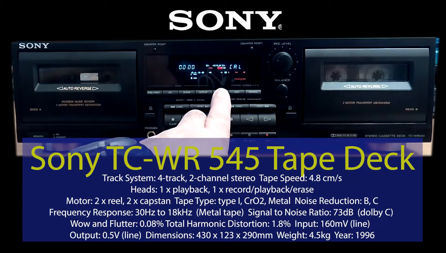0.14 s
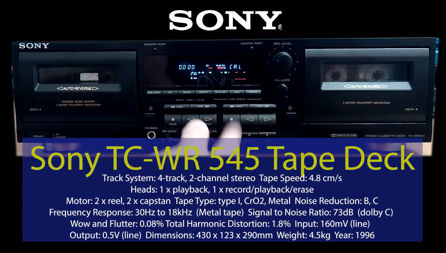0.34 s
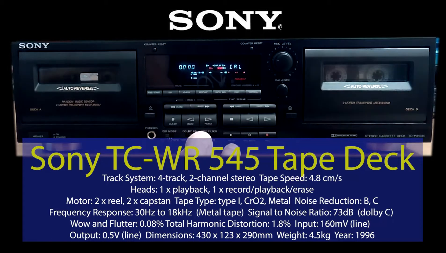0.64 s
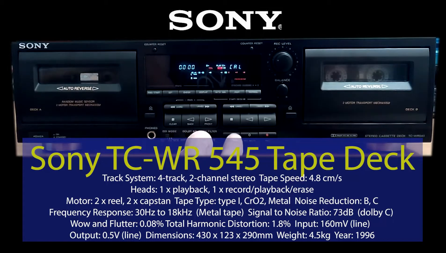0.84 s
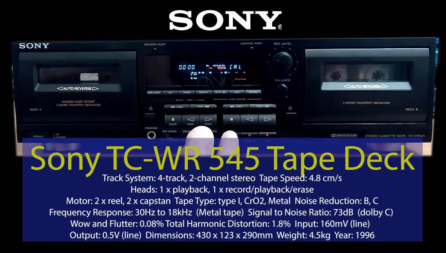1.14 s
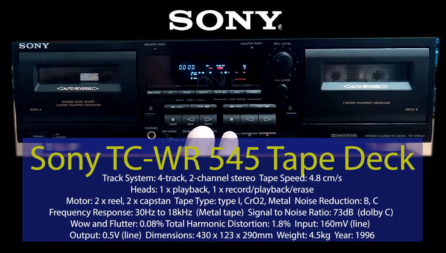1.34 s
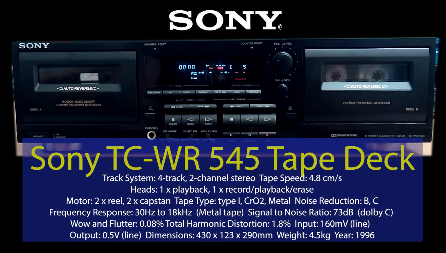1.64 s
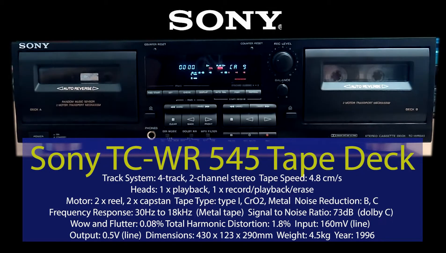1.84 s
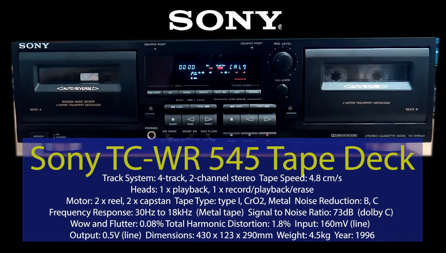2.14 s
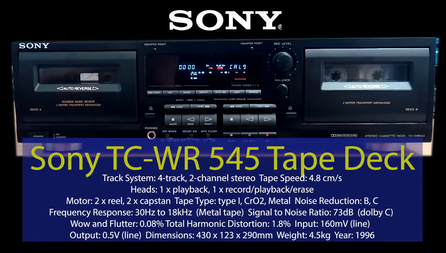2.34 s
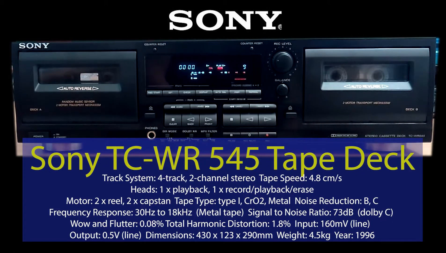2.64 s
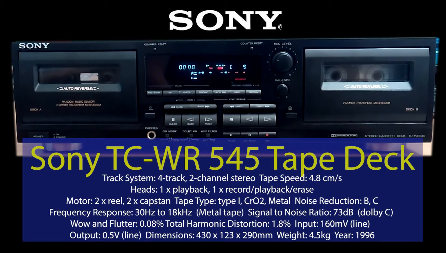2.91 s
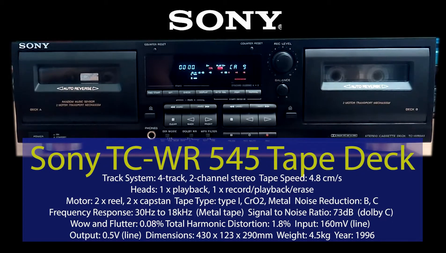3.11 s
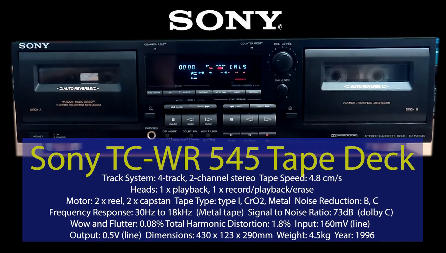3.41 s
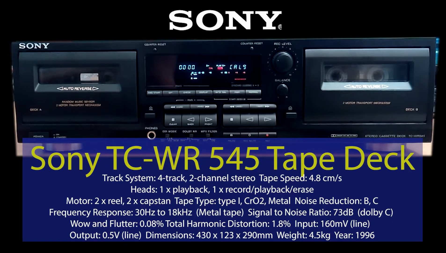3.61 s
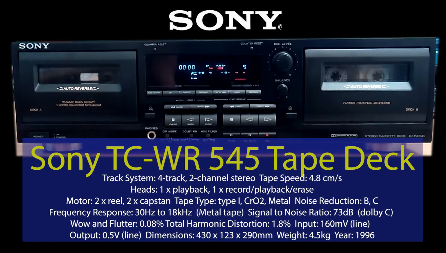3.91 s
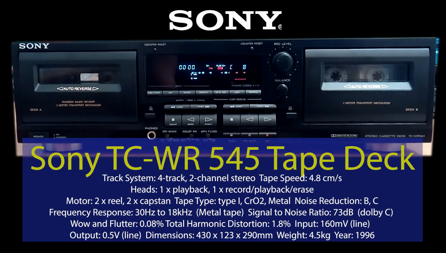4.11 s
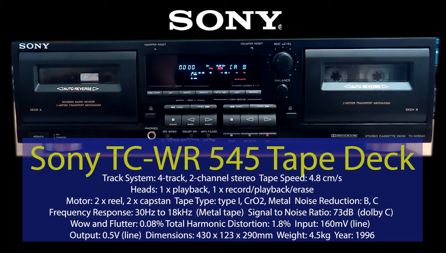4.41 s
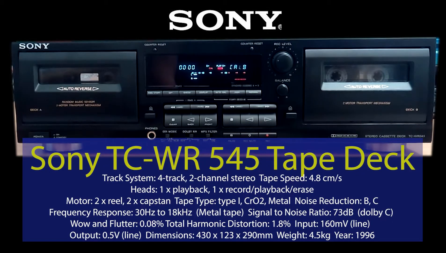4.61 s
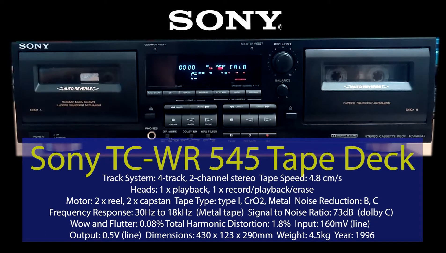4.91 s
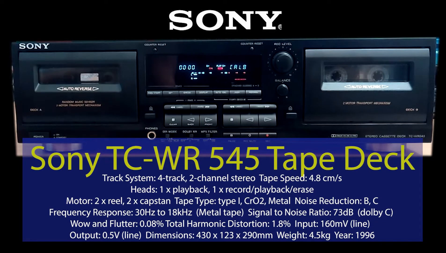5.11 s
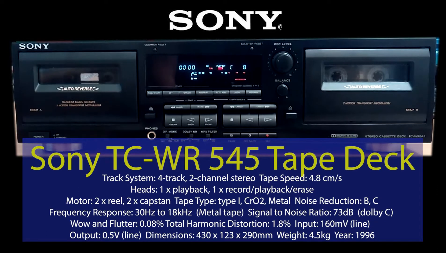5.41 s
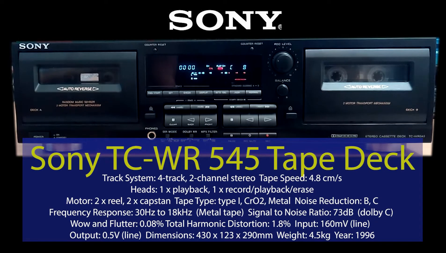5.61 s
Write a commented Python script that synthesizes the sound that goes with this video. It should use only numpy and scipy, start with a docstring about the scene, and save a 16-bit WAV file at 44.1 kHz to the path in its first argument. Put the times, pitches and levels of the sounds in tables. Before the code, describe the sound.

A cassette deck button clicks, then the transport clunks and clatters in bursts with a brief gear whir, leaving faint hiss in a quiet room.

```python
"""A button clicks on a cassette deck in a quiet, hard-walled room.
A cam drops the head plate three times and lifts it twice, always with the same run of clicks and thuds;
in between the reel gears engage, whir through a short rewind and let go. Clicks are shaped noise bursts,
thuds are decaying case modes over low noise, and the whir is noise pulsed by gear teeth.
The steel case and the room ring after each blow, over a motor rumble, hum, whines and hiss."""
import sys
import numpy as np
from scipy import signal
from scipy.fft import rfft, irfft
from scipy.io import wavfile
from scipy.ndimage import uniform_filter1d, minimum_filter1d

SR = 44100
rng = np.random.default_rng(int(sys.argv[2]) if len(sys.argv) > 2 else 0)


def output_pcm(signal):
    """Save a mono or channel-first signal as 16-bit PCM at the path in sys.argv[1].

    Samples are clipped to [-1, 1] before scaling.
    """
    pcm = np.clip(np.atleast_2d(signal).T, -1, 1) * 32767
    wavfile.write(sys.argv[1], SR, np.round(pcm).astype(np.int16))


N = 253575
TIME = np.arange(N) / SR
EDGE_HZ = 15500  # upper band limit

# Directivity of the deck. Each row: frequency in Hz, left over right in dB.
LEAN = [(100, 3.5), (400, 5), (700, 3.5), (1300, 6.5), (2400, 11), (4400, 9), (6000, 4), (8000, 17.5),
        (15000, 26)]

# Parts that click. Each: rise in ms and decay in ms, resonance in Hz, its height in dB and its width
# in octaves (0 leaves no peak), lowest radiated frequency in Hz, fizz in dB before a share of the
# height is added, ring of case and room in dB. The signs of rise and width do not matter.
BUTTON_SNAP = (0.84, 1.4, 2570, 6.5, 0.8, 2232, -9, -0.5)
BUTTON_SPRING = (-0.5, 6.9, 3600, 14, 0.2, 1330, 6, -8)
BUTTON_SEAT = (0.4, 12.5, 926, 14.5, 0.34, 300, -10, -16.5)
LATCH = (1.14, 2, 2700, 10, 0.46, 1058, -14, -1.5)
TRIGGER = (3, 5, 1245, 2.5, 0.5, 857, -2.5, 0.5)
PAWL = (1.5, 2.5, 3000, 16.5, 0, 700, -3, -2)
CATCH = (0.7, 8.5, 5300, 6, 1.8, 500, 8.5, -5)
SLIDE = (0.68, 10, 3400, 3.5, 0.64, 506, 1.2, 1.3)
END_STOP = (0.91, 4.25, 9300, 3.4, 1.7, 1240, 2, 3.45)
HEAD_PLATE = (1.5, 4.5, 1504, 7.5, 0.7, 497, -4.5, 1.5)
LEVER = (1.1, 12.5, 2350, 7.5, 0.55, 497, -7, -5.5)
ROLLER_ARM = (0.5, 8.5, 2805, 18, 0.2, 500, 0, -11)
SPRING = (0.4, 6, 5103, 19, 0.2, 600, 4, -18)
RETURN_SPRING = (0.3, 5, 5377, 11.5, 0.1, 1100, -2.5, -4)
GUIDE_PIN = (1, 7.5, 6440, 15, -0.3, 500, 8.5, -8.5)
LINKAGE = (0.2, 5, 1300, 0, -1.5, 503, -3.5, 2)
CLUTCH = (-0.5, 10.5, 4000, 11, 0.7, 505, 3, -4)
BRAKE = (-0.3, 4.5, 2000, 3.5, -0.6, 1400, 3.5, -0.5)

# Moves of the transport. Each row: time in seconds, relative level in dB.
LIFTS = [(2.422, 0), (5.138, -0.5)]
DROPS = [(2.084, 0.52), (2.822, -0.33), (4.823, -1.14)]
GEAR_SHIFTS = [(3.363, -4.5), (4.438, 0.5)]

# Runs of the gears: idling, slow wind, fast wind, idling.
# Each row: start in seconds, end in seconds, relative level in dB, spin-up in seconds.
GEAR_RUNS = [(2.022, 3.27, -40.5, 0.8), (3.233, 4.41, -29, 0.094), (3.47, 4.044, -23.5, 0.1),
             (4.413, 5.3, -64, 0.05)]


def amp(db):
    """Amplitude gain is ten to the power of a twentieth of the decibels."""
    return 10 ** (np.asarray(db) / 20)


def evened(x):
    """Normalization: dividing by the root mean square gives unit power."""
    return x / np.sqrt(np.mean(x ** 2) + 1e-20)


def read(points, hz):
    """Interpolates a spectrum along a logarithmic frequency axis."""
    f, value = np.transpose(points)
    return np.interp(np.log(hz + 1), np.log(f + 1), value)


def add(mix, s, sound):
    """Superposition: sums a sound into the mix from time s onward."""
    part = mix[..., max(round(s * SR), 0):][..., :sound.shape[-1]]
    part += sound[..., :part.shape[-1]]


def colour(x, db_at, size=2048):
    """Minimum-phase filter with the gain db_at(Hz): its energy comes early, so attacks stay sharp."""
    hz = abs(np.fft.fftfreq(size, 1 / SR))
    log_gain = np.log(amp(np.maximum(db_at(hz), -100)))
    # the Hilbert transform of the log gain supplies the minimum phase
    spectrum = np.exp(np.conj(signal.hilbert(log_gain)))
    taps = np.fft.ifft(spectrum).real
    return signal.fftconvolve(x, taps)[:len(x)]


def wander(size):
    """Low-passed noise: smooth random motion of rms 1 that changes over about size samples."""
    once = uniform_filter1d(rng.standard_normal(N), size)
    return evened(uniform_filter1d(once, size))


def pair(size, lean):
    """Diffuse-field coherence: noise at two microphones, most alike in the bass, with a level difference."""
    # Each row: frequency in Hz, left-right correlation.
    likeness = [(60, 0.78), (300, 0.73), (600, 0.44), (1100, 0.34), (3000, 0.11), (12000, 0.073)]
    hz = np.fft.rfftfreq(size, 1 / SR)
    left, other = rfft(rng.standard_normal((2, size)))
    same = np.clip(read(likeness, hz), -1, 1)
    right = same * left + np.sqrt(1 - same ** 2) * other
    return irfft([left, right * amp(-read(lean, hz))], size)


def hiss(db=-51):
    """Stationary filtered noise: a faint steady hiss, its level set at the left microphone."""
    # Spectrum. Each row: frequency in Hz, relative level in dB per Hz.
    hiss_colour = [(20, -23), (60, -10), (120, -5), (300, -6.5), (1000, -8.5), (2200, -7.5), (3200, -7),
                   (4500, -8.5), (5700, -8), (6600, -12.5), (8000, -22), (15000, -26)]
    # Each row: frequency in Hz, left over right in dB.
    hiss_lean = [(100, 8), (1000, 5.5), (2200, 6), (3800, 13), (5700, 5.5), (8000, 2.5), (15000, -1.5)]
    sides = pair(N + 2048, hiss_lean)
    noise = np.array([colour(side, lambda hz: read(hiss_colour, hz)) for side in sides])
    noise = noise[:, -N:]  # drops the filter's onset
    return amp(db) * noise / noise[0].std()


def tones(waver=0.53):
    """Phase-modulated sinusoids: steady hum, and whines that switch on and off with the electronics."""
    # Each row: start in seconds, end in seconds, frequency in Hz, rms level at the left in dB.
    hum_and_whines = [(0, 5.75, 119, -67.5), (0, 1.9, 2570, -69), (0.599, 1.7, 5500, -68),
                      (1.43, 1.65, 5500, -64.5), (1.61, 3.1, 7200, -60.5), (1.61, 2.6, 13340, -74),
                      (1.61, 1.9, 3100, -67)]
    out = np.zeros(N)
    for start, end, hz, db in hum_and_whines:
        gate = np.clip(np.minimum(TIME - start, end - TIME) / 0.0062, 0, 1)
        drift = waver * evened(uniform_filter1d(rng.standard_normal(N), 1500))  # radians
        out += amp(db) * np.sqrt(2) * gate * np.sin(2 * np.pi * hz * TIME + drift)
    return out * amp([[0], [-8]])  # left, right


def motor(db=-52, rumble_hz=300, octaves=0.75, lumps_db=2, ramp_s=0.056):
    """Band-limited noise: the reel motor rumbles, slightly uneven, as long as the tape winds, slow or fast."""
    start, end = GEAR_RUNS[1][:2]
    running = np.clip(np.minimum(TIME - start, end + ramp_s - TIME) / ramp_s, 0, 1)
    band = lambda hz: -6 * (np.log2((hz + 1) / rumble_hz) / octaves) ** 2
    rumble = colour(rng.standard_normal(N), band)
    level = amp(db + lumps_db * wander(size=600))
    return evened(rumble) * running * level * amp([[0], [-4]])  # left, right


def metal_db(hz):
    """Resonance: each metal part of the transport lifts a narrow band around its own frequency."""
    # Each row: frequency in Hz, width in Hz, relative lift in dB.
    metal = [(764, 33, 5), (869, 40, 4), (1230, 155, 7), (1502, 26, 3.5), (1695, 102, 7), (1762, 27, 3.5),
             (1910, 47, -1), (2080, 110, 7.5), (2200, 44, -2.5), (2655, 305, 9), (3127, 42, 5.5),
             (3565, 57, 3), (4280, 340, 4), (4680, 96, 1.5), (4850, 89, 2.5), (5130, 49, 1.5)]
    return sum(db / (1 + (2 * (hz - f) / width) ** 2) for f, width, db in metal)


def drive(spin_down_s=0.022):
    """Inertia: each gear run spins up, holds and coasts down exponentially; runs add in power."""
    runs = []
    for start, end, db, spin_up in GEAR_RUNS:
        rise = np.clip((TIME - start) / spin_up, 0, 1)
        coast = np.exp(-np.maximum(TIME - end, 0) / spin_down_s)
        runs.append(amp(db) * rise * coast)
    return np.linalg.norm(runs, axis=0)


def gears(tooth_hz=348, wheel_hz=38.1, wobble=0.06, lumps_db=2.0, rub=0.56, contact=0.21,
          buzz_hz=2750, buzz_width_hz=350, buzz_db=-7, buzz_lumps_db=4):
    """Amplitude modulation: teeth rasp in turn, harder once each turn of a wheel; a loose part buzzes in fits."""
    # Spectrum of the rasp. Each row: frequency in Hz, relative level in dB per Hz.
    gear_colour = [(60, -42), (150, -33), (320, -35), (600, -19.5), (800, -8.5), (1500, -9.5), (2200, -4),
                   (2700, -0.5), (3400, 5), (4100, -3.5), (5200, 1), (6400, -10.5), (7400, -28.5),
                   (15000, -49)]
    seconds_run = np.cumsum(1 + 0.0092 * wander(size=4000)) / SR  # the speed wanders
    # contact is the decay of a tooth's pulse as a share of the tooth period
    teeth = rub + np.exp(-(tooth_hz * seconds_run % 1) / contact)
    turn = 1 + wobble * np.sin(2 * np.pi * wheel_hz * seconds_run)
    load = teeth * turn * amp(lumps_db * wander(size=200))
    rasp = colour(load * rng.standard_normal(N), lambda hz: read(gear_colour, hz) + .5 * metal_db(hz))
    fits = load * amp(buzz_lumps_db * wander(size=200)) * rng.standard_normal(N)
    buzz = colour(fits, lambda hz: -20 * np.log10(1 + (2 * (hz - buzz_hz) / buzz_width_hz) ** 2))
    return evened(evened(rasp) + amp(buzz_db) * evened(buzz)) * drive()


def landings():
    """Repeatable mechanism: each move brings its own thuds, listed as (s, level dB, four band dB, length)."""
    # Heavy blows that shake the case. Each row: delay after the move in seconds, boom, panel, frame
    # and knock in relative dB, length of swell and ring as a factor.
    lift_thuds = [(0, -50.5, -52.5, -45, -35.5, 1), (0.08, -59, -46.5, -35, -44, 0.68),
                  (0.192, -40, -27.5, -33, -29.5, 1)]
    drop_thuds = [(0, -44.5, -38, -22.5, -30.5, 0.99)]
    shift_thuds = [(0.00061, -55.5, -39, -26.5, -35, 1)]
    # Thuds that come only once. Each row: time in seconds, then the same columns.
    lone_thuds = [(0.885, -77, -62, -51.5, -44, 0.89), (0.989, -66, -50, -46, -36.5, 0.55),
                  (2.236, -67, -46.5, -38, -50, 0.72), (2.945, -32, -41, -27, -34, 0.86),
                  (3.116, -47, -34.5, -34, -30.5, 0.68), (4.604, -64, -49, -33, -33, 0.94)]
    out = []
    for times, run in [(LIFTS, lift_thuds), (DROPS, drop_thuds), (GEAR_SHIFTS, shift_thuds)]:
        for s, move_db in times:
            out += [(s + delay, move_db, bands, length) for delay, *bands, length in run]
    return out + [(s, 0, bands, length) for s, *bands, length in lone_thuds]


def thuds(rise_s=0.036, modes_db=6, wash_db=2, wash_t60=0.54):
    """Modal excitation: a landing sets the case modes swinging, over a dense wash of low room resonances."""
    # Where boom, panel, frame and knock sound, in Hz.
    thud_hz = [85, 200, 380, 850]
    # Low modes of the case. Each row: frequency in Hz, relative level in dB,
    # 60 dB decay time in seconds for a thud of length 1.
    case = [(63.3, -26, 0.39), (88.7, 1, 0.39), (189.7, -6, 0.59), (230.4, -12, 0.19), (279, -2, 0.6),
            (311, -1.5, 0.38), (350, -12, 0.81), (385.4, -10.5, 0.52), (431.6, -3, 0.22),
            (521.4, -12, 0.63), (577, -14, 0.72), (732, -5.5, 0.4), (800, -11, 0.45), (924, -8, 0.36)]
    # Spectrum of the wash. Each row: frequency in Hz, relative level in dB.
    wash_colour = [(25, 3), (60, 18), (90, 26.5), (150, 19), (220, 23.5), (420, 16.5), (600, 14),
                   (850, 13.5), (1100, 8), (1500, 6), (5000, -60)]
    out, t, hz = np.zeros((2, N)), np.arange(SR) / SR, np.fft.rfftfreq(SR, 1 / SR)
    for s, level_db, bands, length in landings():
        shake = list(zip(thud_hz, bands))
        age = t / length  # longer thuds swell and die more slowly
        phases = rng.uniform(0, 2 * np.pi, len(case))
        modes = np.zeros(SR)
        for (f, db, t60), phase in zip(case, phases):
            modes += amp(read(shake, f) + db - 60 * age / t60) * np.sin(2 * np.pi * f * t + phase)
        wash = irfft(rfft(pair(SR, LEAN)) * amp(read(shake, hz) + read(wash_colour, hz)))
        wash = wash * amp(wash_db - 60 * age / wash_t60)
        body = modes * amp([[modes_db], [modes_db - 5]]) + wash
        add(out, s, amp(level_db) * body * (1 - np.exp(-age / rise_s)))
    return out


def ring(x, build_s=0.0022, swell_s=0.055, swell=0.72, metal=1.0):
    """Reverberation of case and room: reflections pile up for a moment, then die band by band."""
    # Spectrum of the ring. Each row: frequency in Hz, relative level in dB.
    ring_colour = [(200, 6.5), (700, 4), (1000, 5.5), (1800, -0.5), (2700, -6), (3800, 1.5), (5600, -1),
                   (8000, 5), (11000, 1.5), (15000, 1)]
    # Each row: frequency in Hz, 60 dB decay time in seconds.
    ring_t60 = [(100, 0.45), (400, 0.61), (1500, 0.35), (3000, 0.42), (6000, 0.41), (12000, 0.2)]
    hz, t, z = signal.stft(pair(SR, LEAN), SR, nperseg=256)
    decay = amp(-60 * t / read(ring_t60, hz)[:, None])
    tail = signal.istft(z * decay, SR, nperseg=256)[1]
    t = np.arange(tail.shape[1]) / SR
    tail = tail * (1 - np.exp(-t / build_s)) * (1 + swell * (1 - np.exp(-(t / swell_s) ** 2)))
    tail = tail / np.linalg.norm(tail[0])
    ring_db = lambda hz: read(ring_colour, hz) + metal * metal_db(hz) - 3.5
    tail = np.array([colour(side, ring_db) for side in tail])
    return signal.fftconvolve(x[None], tail, axes=1)[:, :N]


def direct(x, right_db=-3, scatter=1.0):
    """Direct sound and shadowing: the right is shaded and gets part of it scattered off the front panel."""
    taps = rng.standard_normal(2 ** 8) * np.hanning(2 ** 9)[2 ** 8:]  # short fading scatter
    scattered = signal.fftconvolve(x, taps / np.linalg.norm(taps))[:N]
    right = (x + scatter * scattered) / np.hypot(1, scatter)
    shaded = colour(right, lambda hz: -read(LEAN, hz))
    return np.array([x, amp(right_db) * shaded])


def strikes():
    """Repeatable mechanism: each move plays its own run of clicks, listed as (s, level dB, part, material)."""
    # Clicks of each move. Each row: delay after the move in seconds, level in dB over 10 ms
    # before the move's level is added, part.
    lift_clicks = [(-0.024, -39.5, SLIDE), (0, -15, TRIGGER), (0.0802, -17.5, PAWL), (0.1042, -19, CATCH),
                   (0.1662, -18.5, SLIDE), (0.181, -18.5, LINKAGE), (0.1925, -10.5, END_STOP),
                   (0.276, -22.5, LINKAGE)]
    drop_clicks = [(-0.014, -31, LINKAGE), (0, -12.5, HEAD_PLATE), (0.009, -19.5, LINKAGE),
                   (0.032, -20.5, SLIDE), (0.077, -16, LEVER), (0.089, -23, CLUTCH),
                   (0.103, -19, ROLLER_ARM), (0.121, -28, GUIDE_PIN)]
    shift_clicks = [(-0.013, -14.5, SLIDE), (0, -15, LINKAGE), (0.002, -10.5, END_STOP)]
    # The button snaps in, springs back and knocks home.
    # Each row: time in seconds, level in dB over 10 ms, part.
    button_clicks = [(0.8106, -16, BUTTON_SNAP), (0.883, -17.5, BUTTON_SPRING),
                     (0.9884, -22.5, BUTTON_SEAT)]
    # Clicks that come only once, from parts that catch or settle: same columns as the button's.
    lone_clicks = [(2.021, -16.5, LATCH), (2.228, -21, CATCH), (2.237, -21.5, SPRING),
                   (2.54, -16.5, ROLLER_ARM), (2.837, -14.5, HEAD_PLATE), (2.943, -12.5, SLIDE),
                   (2.951, -16.5, CLUTCH), (3.023, -17.5, LEVER), (3.11, -18.5, RETURN_SPRING),
                   (3.278, -29, LINKAGE), (4.083, -17, CLUTCH), (4.233, -28, LEVER), (4.495, -20, LINKAGE),
                   (4.603, -11, BRAKE)]
    # Spectra of the button and of the transport. Each row: frequency in Hz, relative level in dB per Hz.
    button_colour = [(100, -42), (400, -21), (1000, 1.5), (1700, -0.5), (2500, -3), (4000, -1.5),
                     (5000, -6.5), (6200, -10.5), (7400, -19.5), (9300, -26), (10500, -45), (15000, -46)]
    click_colour = [(100, -15.5), (400, -15), (750, -10.5), (1100, -10.5), (1700, -2.5), (2700, 2),
                    (3800, -4.5), (5400, -4), (6400, -8.5), (7300, -22.5), (9000, -30.5), (12000, -35),
                    (15000, -48)]
    cam = []
    for times, run in [(LIFTS, lift_clicks), (DROPS, drop_clicks), (GEAR_SHIFTS, shift_clicks)]:
        for s, move_db in times:
            cam += [(s + delay, move_db + db, part) for delay, db, part in run]
    button = [(*row, button_colour) for row in button_clicks]
    return button + [(*row, click_colour) for row in cam + lone_clicks]


def clicks(grit_db=0.5, shelf_db=14, shelf_octaves=0.27, fizz_hz=6500, size=4096, count=6):
    """Impact: parts strike and chatter for a few ms; gives the near sound and the blows to spots of the case."""
    near, blows, ms = np.zeros(N), np.zeros((count, N)), np.arange(size) / SR * 10 ** 3
    for k, (s, db, struck, material) in enumerate(strikes()):
        rise_ms, decay_ms, part_hz, part_db, octaves, low_hz, fizz_db, ring_db = struck
        contacts, grit = rng.standard_normal((2, size))
        envelope = np.exp(-ms / decay_ms) * (1 - np.exp(-(ms / rise_ms) ** 2))
        chatter = contacts * amp(grit_db * grit) * envelope
        part = lambda hz: part_db * np.exp(-.5 * (np.log2((hz + 1) / part_hz) / octaves) ** 2)
        # small parts radiate little bass
        small = lambda hz: -shelf_db * np.clip(np.log2(low_hz / (hz + 1)) / shelf_octaves, 0, 1)
        fizz = lambda hz: (fizz_db + 0.19 * part_db) * np.clip((hz - fizz_hz) / 1500, 0, 1)
        click = colour(chatter, lambda hz: read(material, hz) + part(hz) + small(hz) + fizz(hz))
        click = amp(db) * click * np.sqrt(SR / 10 ** 2 / np.sum(click ** 2))  # its energy taken over 10 ms
        add(near, s, click)
        add(blows[k % count], s, click * amp(ring_db))
    return near, blows


def scene(click_db=0, ring_db=0, gear_near_db=-3, gear_ring_db=-3):
    """Superposition of direct and reverberant sound: the deck close by on the left, and the quiet background."""
    near, blows = clicks()
    whir = gears()
    straight = direct(amp(click_db) * near + amp(gear_near_db) * whir)
    blow_ring = amp(ring_db) * sum(ring(spot) for spot in blows)
    whir_ring = amp(gear_ring_db) * ring(whir)
    return straight + blow_ring + whir_ring + thuds() + motor() + tones() + hiss()


def record(dry):
    """Peak limiting, then low-pass filtering: a quick gain dip holds the highest peaks under full scale."""
    headroom = .95 / np.maximum(abs(dry).max(0), .95)
    gain = uniform_filter1d(minimum_filter1d(headroom, size=129), size=129)
    taps = signal.firwin(511, EDGE_HZ, window=("kaiser", 9), fs=SR)
    return signal.oaconvolve(dry * gain, taps[None], "same")


dry = scene()
out = record(dry)
output_pcm(out)
```